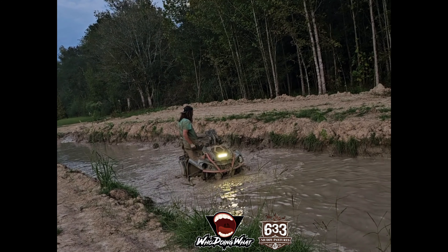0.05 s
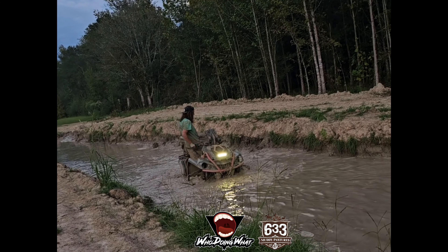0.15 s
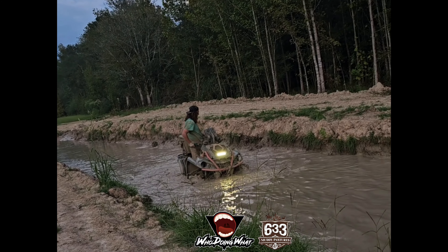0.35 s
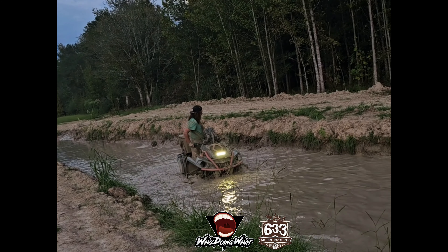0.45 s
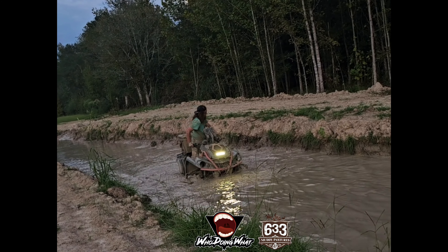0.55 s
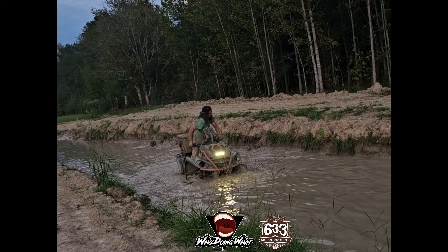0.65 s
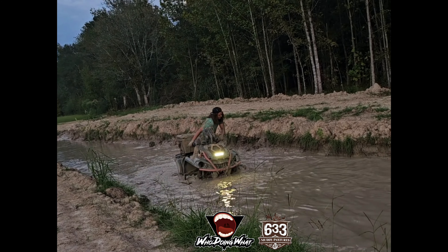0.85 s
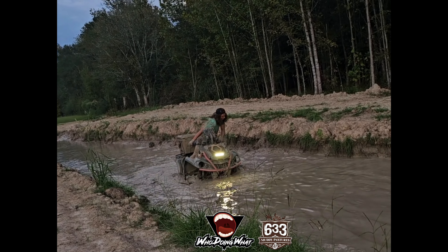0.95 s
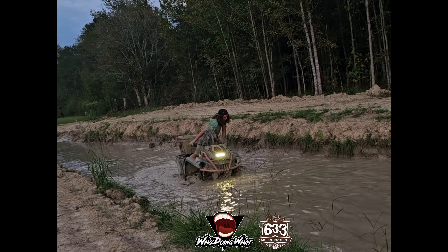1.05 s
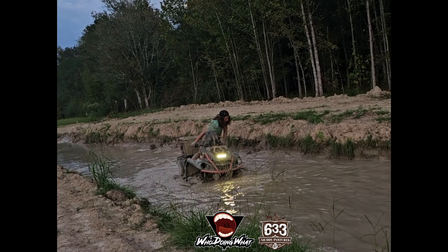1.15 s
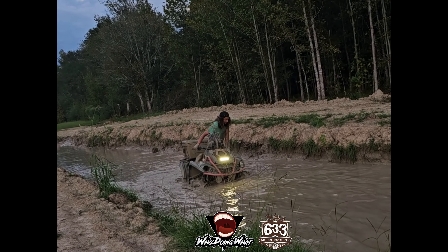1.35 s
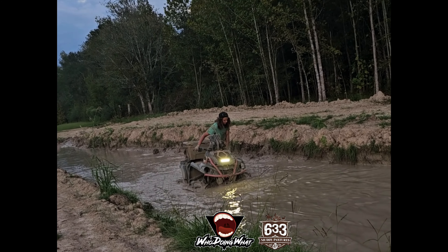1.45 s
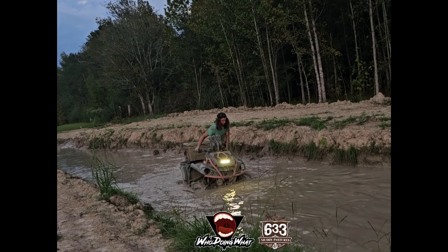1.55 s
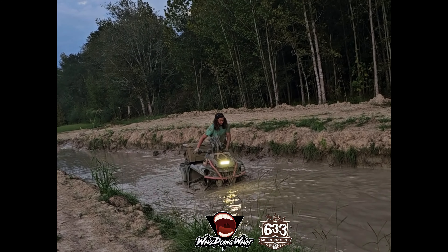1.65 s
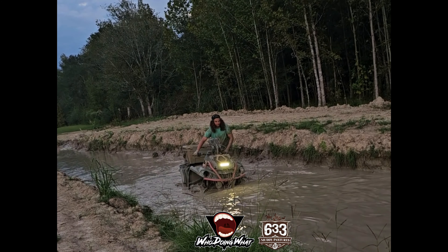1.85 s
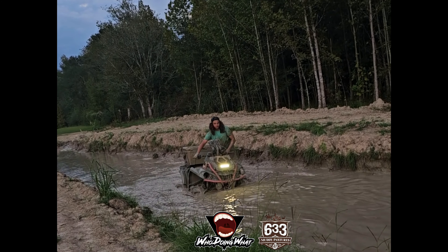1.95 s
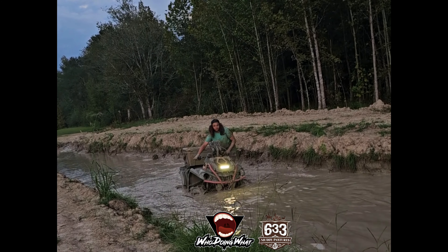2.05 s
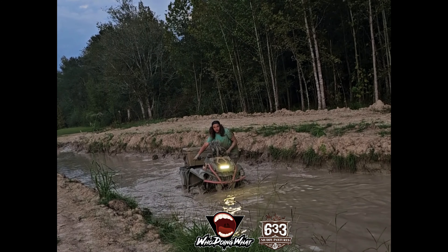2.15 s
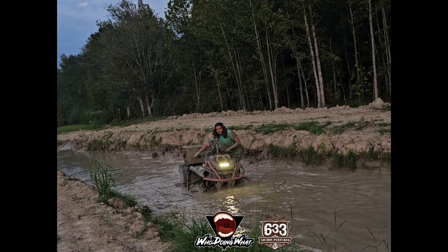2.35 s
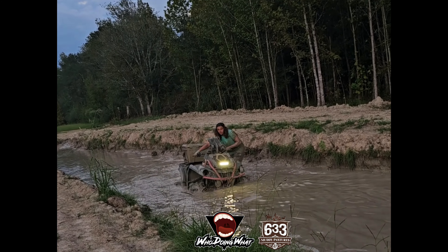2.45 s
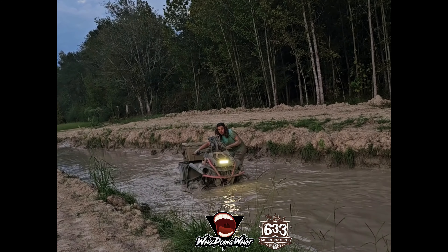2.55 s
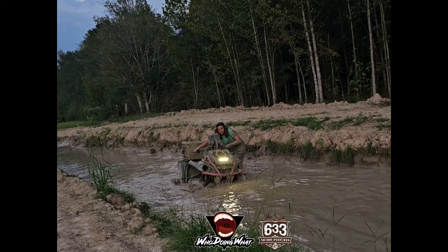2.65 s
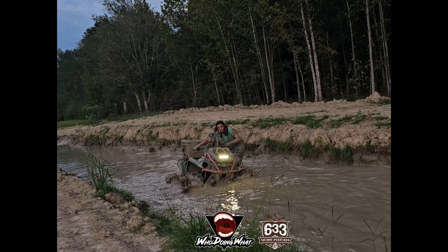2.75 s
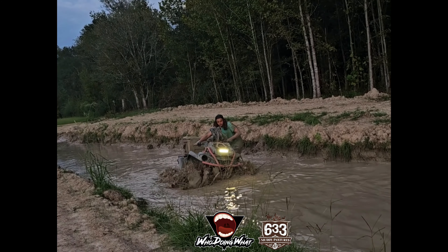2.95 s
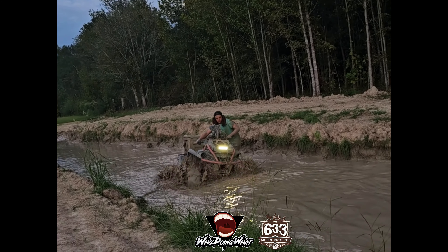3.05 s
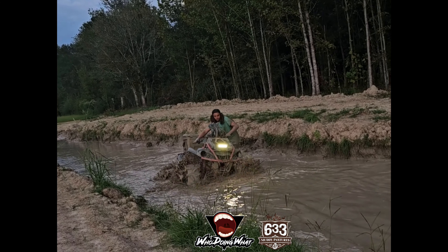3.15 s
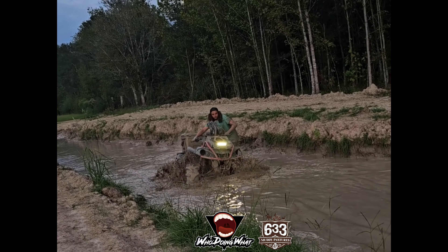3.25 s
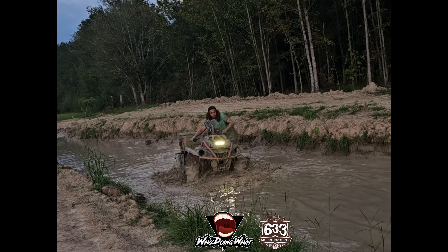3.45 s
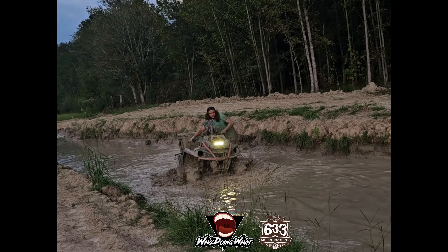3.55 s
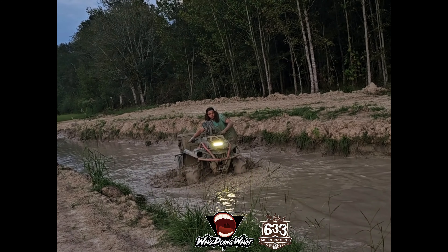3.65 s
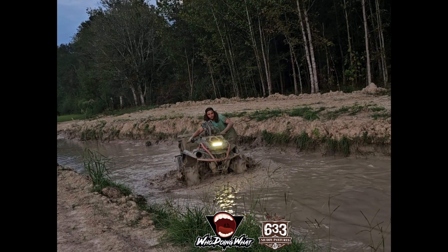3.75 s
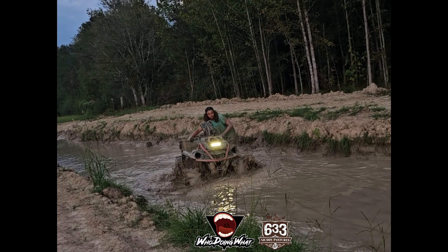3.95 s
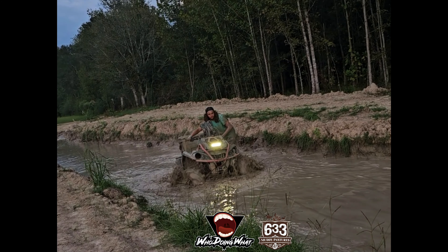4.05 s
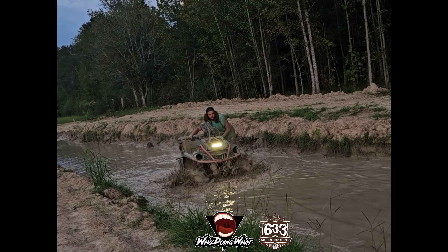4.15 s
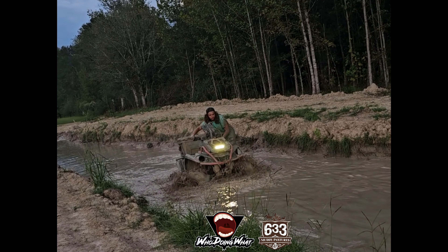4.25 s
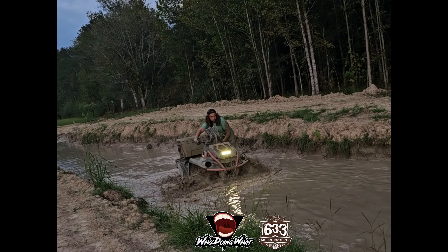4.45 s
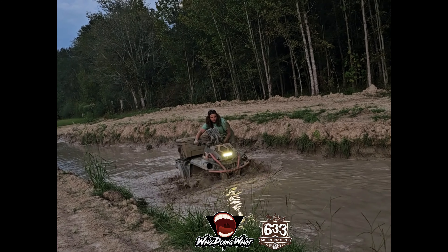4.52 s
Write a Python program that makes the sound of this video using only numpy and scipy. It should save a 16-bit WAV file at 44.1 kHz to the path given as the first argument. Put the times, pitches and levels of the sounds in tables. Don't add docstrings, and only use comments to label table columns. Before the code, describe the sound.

From 0 s, two nearby engines idle at about seventeen pulses a second, drifting against each other, with deep boomy exhaust, valve clatter, frame rumble and lapping water. The stuck quad bike, left, mutters low until 1.7 s, then climbs in a barking, raspy burst to 2.2 s. The biggest roar, 2.5 to 3.1 s, throws bright hissing spray, with a hard mud knock at 2.9 s. From 3.5 to 6.4 s bursts follow roughly twice a second, with belt howls and squeals around 3.6 to 5 and 6.1 to 6.4 s and slaps near 5.7 s. A distant machine drones, wavering, from about 3.3 s. Between 6.6 and 8.5 s the throttle gives weaker, briefer blips, leaving the idling more exposed. At 8.7 to 9.3 s it roars again, rising to a high rev with spray, a low howl, a mud knock and stronger water wash. Bank and trees return short echoes.

```python
import sys
import numpy as np
from scipy import signal
from scipy.fft import rfft, irfft, next_fast_len
from scipy.io import wavfile
from scipy.ndimage import uniform_filter1d

SR = 44100
rng = np.random.default_rng(int(sys.argv[2]) if len(sys.argv) > 2 else 0)


def ratio(d):
    e = np.asarray(d, float) / 20
    return 10 ** e


def int16_out(signal):
    q = np.round(np.clip(np.atleast_2d(signal).T, -1, 1) * 32767)
    wavfile.write(sys.argv[1], SR, q.astype(np.int16))


N = 406602
TIME = np.arange(N) / SR

# opening in seconds, shutting in seconds, top speed in
# firings per s, load in dB, wheelspin in dB.
BURSTS = [(1.719, 2.181, 43, 18, 18.5), (2.54, 3.081, 51, 22, 20), (3.501, 3.88, 41.7, 15.5, 12.5),
          (4.08, 4.34, 36.4, 14.5, 11), (4.618, 4.97, 43, 17.5, 12), (5.161, 5.4, 37, 16, 9),
          (5.58, 5.927, 38, 14.5, 7), (6.08, 6.37, 44.5, 14.5, 15), (6.598, 6.871, 32.8, 2.5, 8),
          (7.401, 7.52, 33.2, 8.5, 12), (7.736, 7.82, 23.4, 5.5, 10.5), (8.399, 8.52, 31.2, 6.5, 13.5),
          (8.72, 9.086, 45.8, 14, 9.5), (9.08, 9.301, 54, 10.5, 18)]


def rms_one(x):
    return x / np.sqrt(np.mean(x ** 2) + 1e-20)


def in_time(rows):
    s, *columns = np.transpose(rows)
    return [np.interp(TIME, s, c) for c in columns]


def coloured(x, points, share=1):
    size = next_fast_len(N)
    hz, level_db = np.transpose(points)
    bins_hz = np.arange(size // 2 + 1) * SR / size + 1
    gain_db = share * np.interp(np.log(bins_hz), np.log(hz), level_db)
    return irfft(rfft(x, size) * ratio(gain_db), size)[..., :N]


def drift(rate_hz):
    r = np.exp(-80 * np.pi * rate_hz / SR)
    slow = signal.lfilter([1], [1, -2 * r, r * r], rng.standard_normal(N // 40 + 2002))[2000:]
    return np.interp(np.arange(N) / 40, np.arange(len(slow)), rms_one(slow))


def ring(x, hz, t60_s):
    r = ratio(-60 / (t60_s * SR))
    w = 2 * np.pi * hz / SR
    return signal.lfilter([0, np.sin(w)], [1, -2 * r * np.cos(w), r * r], x + 1e-18)


def pipe(x, resonances):
    total = 0
    for k, (hz, width_hz, level_db) in enumerate(resonances):
        total = total + (-1) ** k * ratio(level_db) * np.sqrt(width_hz) * ring(x, hz, 2.37 / width_hz)
    return rms_one(total)


def late(x, seconds):
    return np.interp(TIME - seconds, TIME, x)


def puff(clicks, seconds):
    return signal.lfilter([1], [1, -np.exp(-1 / (seconds * SR))], clicks + 1e-18)


def ports(x, left_lead_s):
    return np.array([late(x, max(-left_lead_s, 0)), late(x, max(left_lead_s, 0))])


def idle(rows, left_lead_s):
    # frequency in Hz, level in dB, t60 in seconds.
    silencer = [(72.4, -14, 0.18), (91.5, -7.5, 0.047), (137, -20.5, .07)]
    tailpipe = [(220, -13, 0.021), (234, -20.5, 0.052), (271.1, -18.5, 0.097), (335.7, -29.5, 0.12),
                (407.4, -33, 0.085), (454, -56, 0.029), (610, -53, 0.03)]
    rate = 16.68
    run_in = SR // 5
    s, lag_ms, strength_db = np.transpose(rows)
    clock_s = np.arange(-2, int(N / SR * rate)) / rate
    chance = rng.standard_normal((len(clock_s), 12))
    fired_s = clock_s + np.interp(clock_s, s, lag_ms) / 1000 - 0.0034
    at = (fired_s * SR).astype(int) + run_in
    heard = at < N + run_in
    strength_db = np.interp(clock_s, s, strength_db) + 0.5 * chance[:, 0]
    struck = []
    for k, (hz, level_db, t60_s) in enumerate(silencer + tailpipe):
        clicks = np.zeros(N + run_in)
        clicks[at[heard]] = ratio(strength_db + level_db + 0.8 * chance[:, k + 1])[heard]
        struck.append(ring(clicks, hz, t60_s))
    tail = sum(struck[len(silencer):])
    blunt = signal.butter(2, 520, fs=SR, output="sos")
    bark = signal.sosfilt(blunt, 0.72 * tail - np.roll(tail, int(0.0019 * SR)))
    boom = np.roll(sum(struck[:len(silencer)]), int(0.0038 * SR))
    high_pass = signal.butter(4, 50.0, "high", fs=SR, output="sos")
    sound = signal.sosfilt(high_pass, bark - boom)[run_in:]
    return ports(sound, left_lead_s), clicks[run_in:] / clicks.max()


def clatter(firings):
    # frequency in Hz, level in dB per Hz.
    hiss_spectrum = [(400, -8.0), (510, 1), (660, -8.5), (800, -15.5), (1020, -17), (1450, -16),
                     (2200, -21.5), (2600, -27.5), (3700, -31), (4500, -35), (5100, -32.5), (5700, -39),
                     (9000, -49), (15700, -68)]
    # frequency in Hz, width in Hz, level in dB.
    whistles = [(4366, 95, -1.4), (5130, 63, -11.5), (1408, 35, 4.5)]
    # time in seconds, extra level in dB.
    wash = [
        (0.0, 0.8),
        (1.8, 0.5),
        (3.5, 1.5),
        (5.0, 1),
        (6.8, 1),
        (7.4, 1),
        (8.2, 4.5),
        (9.22, 7.5),
    ]
    wash_db, = in_time(wash)
    swell = 1 + 1.6 * puff(puff(firings, 0.0027) / (0.0039 * SR), 0.014)
    noise = coloured(rng.standard_normal((2, N)), hiss_spectrum)
    hiss = rms_one(noise * swell * ratio(1.1 * drift(2.7)))
    whistle = ratio(-22.5 - 1.3 * wash_db) * pipe(swell * rng.standard_normal(N), whistles)
    return ratio(-37 + 3.5 + wash_db) * (hiss + whistle)


def speed():
    held, = in_time([(0, 17.3), (1.6, 22.5), (2.5, 24.9), (3.5, 27.1), (4.5, 31.3), (5.4, 30.6),
                     (6.6, 30.2), (7.2, 25), (7.4, 29), (7.8, 22.4), (8.7, 28.6)])
    stall_rate, sag_s = 10.0, 0.4
    rate = held
    for opens, shuts, top, *_ in BURSTS:
        climb = np.interp(TIME, [opens, shuts], [np.interp(opens, TIME, rate), top])
        sag = np.maximum(held, stall_rate + (top - stall_rate) * np.exp((shuts - TIME) / sag_s))
        rate = np.where(TIME < opens, rate, np.where(TIME < shuts, climb, sag))
    return rate


def effort(column, when_open, at_top, release_s):
    opening_s, wide_open_s, wide_open_share = 0.17, 0.21, 0.57
    rises = []
    for row in BURSTS:
        opens, shuts = row[:2]
        wide = shuts - min(wide_open_s, wide_open_share * (shuts - opens))
        corners_s = [wide - opening_s, wide, shuts, shuts + release_s]
        rises.append(row[column] * np.interp(TIME, corners_s, [0, when_open, at_top, 0]))
    return np.max(rises, axis=0)


def spray(firings):
    # frequency in Hz, level in dB per Hz.
    spray_spectrum = [(1500, -35), (2200, -8.5), (2500, -0.5), (3100, -3), (3900, -6.5), (5000, -7),
                      (6300, -7), (7500, -16), (11400, -6), (12700, -10), (14500, -8), (15800, -14)]
    born = rng.random(N) < 2500 * ratio(5.0 * drift(14.0)) / SR
    drops = born * ratio(7.2 * np.minimum(rng.exponential(1, N), 5)) * rng.choice([-1, 1], N)
    hiss = rng.standard_normal((3, N)) * (1 + 0.71 * puff(firings, 0.007)) * ratio(1.3 * drift(23.0))
    hiss = rms_one(hiss)
    dealt = rng.integers(0, 150, N)
    bubbles_hz = np.geomspace(2800, 6500, 6)
    bubbles = sum(ring(drops * (dealt == k), hz, 63.0 / hz) for k, hz in enumerate(bubbles_hz))
    direct = hiss[2] + 0.5 * rms_one(drops) + 0.14 * rms_one(bubbles)
    scattered = hiss[:2]
    return rms_one(coloured(ports(direct, 0.00058) + scattered, spray_spectrum))


def stuck_machine():
    # frequency in Hz, width in Hz, level in dB.
    growl_modes = [(156, 41, -8.5), (211, 52, -5), (268.2, 30, -0.9), (354, 80, -14)]
    honk_modes = [(473, 29, 2), (546, 47, -8)]
    bark_modes = [(677, 73, 3), (804, 45, 4.5), (905, 94, -0.5)]
    rasp_modes = [(1236, 210, 6), (1453, 120, 2), (1533, 120, 2), (2064, 380, -8.5)]
    rate = speed()
    shut_s, spray_fall_s = 0.038, 0.34
    bark_db = -43 + effort(-2, 1, 0.5, shut_s)
    rasp_db = -50 + effort(-1, 1, 0.96, shut_s)
    spray_db = -58 + 0.4644 * (rate - 20) + 0.39 * effort(-1, 1, 0.82, spray_fall_s)
    growl_db = -31.0 + 0.17 * (rate - 20) + 0.33 * (uniform_filter1d(bark_db, size=SR // 10) + 43.0)

    turns = np.cumsum(rate * (1 + 0.012 * drift(9.0))) / SR
    fired = np.diff(np.floor(turns), prepend=0) * ratio(1.3 * rng.standard_normal(N))
    second = np.diff(np.floor(turns + 0.42), prepend=0) * ratio(-5.0 + 2.5 * rng.standard_normal(N))
    rush = (puff(fired + second, 0.01) + 0.16) * rng.standard_normal((3, N))
    kicks = rms_one(fired + 0.19 * second)
    clean = kicks + 0.3 * rms_one(rush[0])
    hoarse = kicks + 0.9 * rms_one(rush[1])
    harsh = kicks + 1.4 * rms_one(rush[2])

    growl = ratio(growl_db) * pipe(clean, growl_modes)
    honk = ratio(0.46 * bark_db + 0.3 * growl_db - 10.0) * pipe(clean, honk_modes)
    bark = ratio(bark_db + 0.5) * pipe(hoarse, bark_modes)
    rasp = ratio(rasp_db - 1.0) * pipe(harsh, rasp_modes)
    exhaust = 0.84 * growl + bark + rasp
    echoes = np.array([late(exhaust, 0.031) - 0.6 * late(exhaust, 0.076),
                       0.48 * late(exhaust, 0.12) - late(exhaust, 0.047)])
    sound = 0.83 * growl + honk + ports(exhaust, 0.00054) + ratio(-4.5) * echoes
    return sound + ratio(spray_db + 2.5) * spray(fired + second)


def rumble():
    # frequency in Hz, level in dB per Hz.
    rumble_spectrum = [(30, -30.5), (48, -19.5), (70, 23.5), (130, 15), (250, 14.5), (380, 1), (600, -47)]
    mid, side = coloured(rng.standard_normal((2, N)), rumble_spectrum)
    return ratio(-23.5 + 3.1 * drift(8.1)) * rms_one(mid + 0.074 * side * [[1], [-1]])


def mud_slaps():
    # time in seconds, peak in dB.
    slaps = [
        (2.899, -14.5),
        (3.856, -24.5),
        (5.66, -29),
        (5.715, -18),
        (7.485, -22.5),
        (8.469, -27.5),
        (9.191, -17),
    ]
    # frequency in Hz, level in dB, t60 in seconds.
    slap_modes = [(960, -1, 0.015), (1900, -5.5, .008), (3050, -10, .012), (4700, -17.5, .006)]
    s, peak_db = np.transpose(slaps)
    clicks = np.zeros(N)
    clicks[(s * SR).astype(int)] = ratio(peak_db - 2.5)
    knocks = sum(ratio(level_db) * ring(clicks, hz, t60_s) for hz, level_db, t60_s in slap_modes)
    return ports(knocks, 0.0002)


def far_machine():
    # time in seconds, speed in firings per s, drone level in dB.
    passing = [(3.3, 27.4, -32.5), (3.6, 32.9, -34), (4.0, 34, -28), (4.3, 37.8, -22), (4.7, 39.8, -23),
               (5.1, 34.2, -28), (5.5, 32.6, -26), (6.0, 33.6, -22.5), (6.45, 33.4, -25),
               (6.65, 28.1, -26.5), (7.2, 27.5, -40), (7.5, 26, -27), (7.8, 30.5, -26), (8.1, 30, -26),
               (8.4, 30.1, -27), (8.6, 27.8, -25), (8.9, 29.4, -25), (9.22, 31, -24)]
    # multiple, level in dB.
    far_orders = [(2, -11), (4, -12.5), (5, -15), (6, 2), (7, -0.5), (8, -7), (9, -27.5)]
    rate, drone_db = in_time(passing)
    phase = 2 * np.pi * np.cumsum(rate * (1 + 0.00445 * drift(4.39))) / SR
    waver_db = 1.2 * drift(5.0)
    drone = sum(ratio(level_db + waver_db) * np.sin(k * phase) for k, level_db in far_orders)
    return np.sqrt(2) * ratio(drone_db) * drone * (TIME > passing[0][0])


def belt():
    # start in seconds, end in seconds, pitch in Hz, level in dB.
    howls = [
        (3.64, 3.91, 760, -38),
        (3.958, 4.42, 516, -35.5),
        (6.15, 6.42, 460, -36),
        (4.12, 4.36, 1270, -43.5),
        (4.657, 4.99, 1345, -47),
        (6.118, 6.386, 1167, -34.5),
        (6.637, 6.878, 1256, -42),
        (8.864, 9.215, 790, -36),
    ]
    width_hz, edge_s = 92, 0.04
    noise = rng.standard_normal(N) * ratio(2.0 * drift(20.0))
    total = 0
    for start, end, hz, level_db in howls:
        corners_s = [start - edge_s, start + edge_s, end - edge_s, end + edge_s]
        slip = np.interp(TIME, corners_s, [0, 1, 1, 0])
        total = total + ratio(level_db) * pipe(noise, [(hz, width_hz, 0)]) * slip
    return ports(total, 0.00018)


def scene():
    # time in seconds, lag of the firing behind the clock in ms, strength in dB.
    idle_a = [(0.0, 29.5, 1.5), (0.54, 28, 2.5), (0.85, 22, 1), (1.5, 27, 2.6), (1.95, 29.5, 3.5),
              (3.24, 30, 1), (3.48, 27.5, 3), (3.75, 29.5, 3.1), (4.14, 24, -0.5), (4.62, 26, 2.5),
              (4.87, 21.5, 0.2), (5.22, 24.5, 0.5), (6.18, 19.5, -0.7), (6.8, 8.5, 3), (7.02, 9, 3),
              (7.2, 13, 0.7), (8.09, 10, 3), (8.6, -0.36, 1.4)]
    idle_b = [(0.0, -5, 2.8), (0.42, 3.5, 1.2), (1.32, 7.5, 2.8), (1.86, 18.5, 1), (2.76, 22.6, 0.2),
              (3.84, 26, 2), (4.12, 16.5, 0.7), (4.45, 20, 0.5), (4.65, 18, 1.5), (5.78, 22, 1.1),
              (5.98, 28.5, 0), (6.18, 20.5, 2.3), (6.7, 16.5, 0.5), (7.0, 18.5, 1.3), (7.46, 18, 0.9),
              (7.97, 30, 0.4), (8.21, 46.5, 1.5), (9.25, 139.5, 0.7)]
    a, fired_a = idle(idle_a, -0.00013)
    b, fired_b = idle(idle_b, -0.00015)
    idling = a + b + clatter(fired_a + fired_b)
    return idling + stuck_machine() + rumble() + mud_slaps() + far_machine() + belt()


def top_cut(x):
    return signal.sosfilt(signal.butter(12, 15880, fs=SR, output="sos"), x)


def record(dry):
    # frequency in Hz, left minus right in dB.
    shadow = [(60, 0.0), (110, 0.0), (200, 1.0), (380, 0.0), (700, 2.5), (1290, -0.5), (2380, -0.5),
              (4400, 8.5), (8120, 13.0), (15000, 10.0)]
    # frequency in Hz, gain in dB.
    port_notch = [(6500, 0.33), (7700, 2), (8300, -14.5), (8700, -32.5), (9300, -15.5), (10300, -14),
                  (11500, -6)]
    bass_cut = [(15, -9), (35, -4.5), (55, -3.5), (65, 0)]
    shaded = np.array([coloured(dry[0], shadow, share=0.5), coloured(dry[1], shadow, share=-0.5)])
    rounded = 1.489 * np.tanh(coloured(shaded, port_notch) / 1.66)
    mix = np.clip(coloured(rounded, bass_cut), -1, 1)
    return top_cut(mix)


dry = scene()
out = record(dry)
int16_out(out)
```